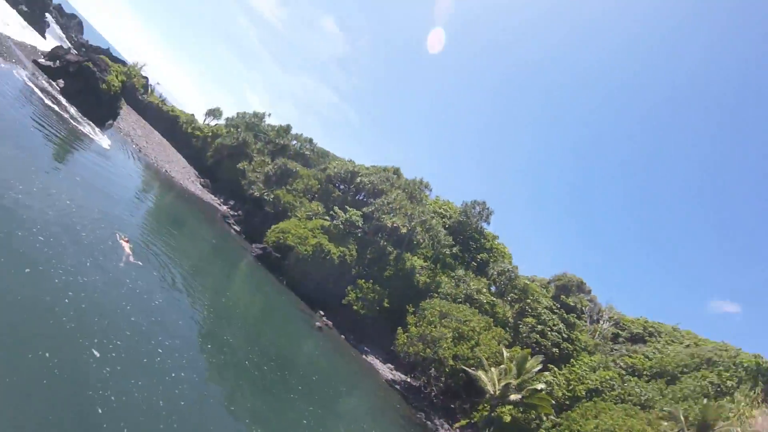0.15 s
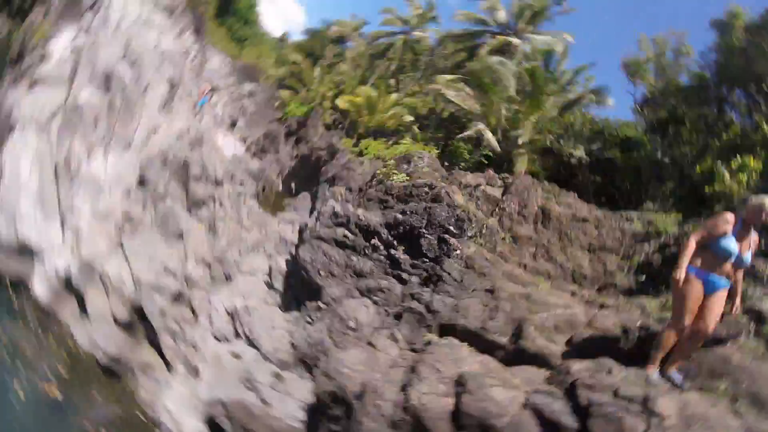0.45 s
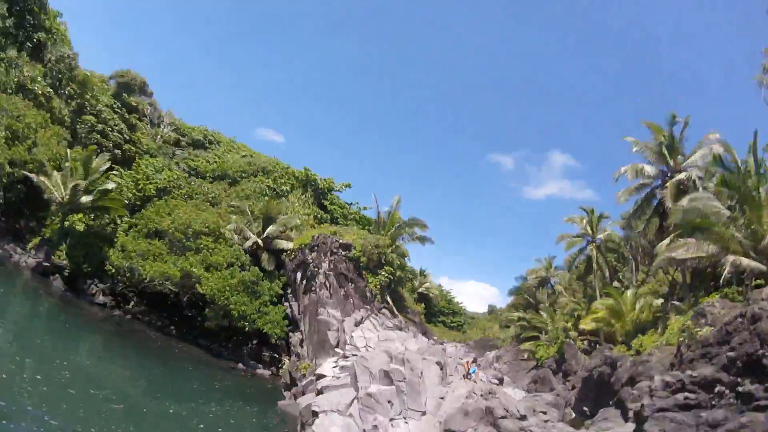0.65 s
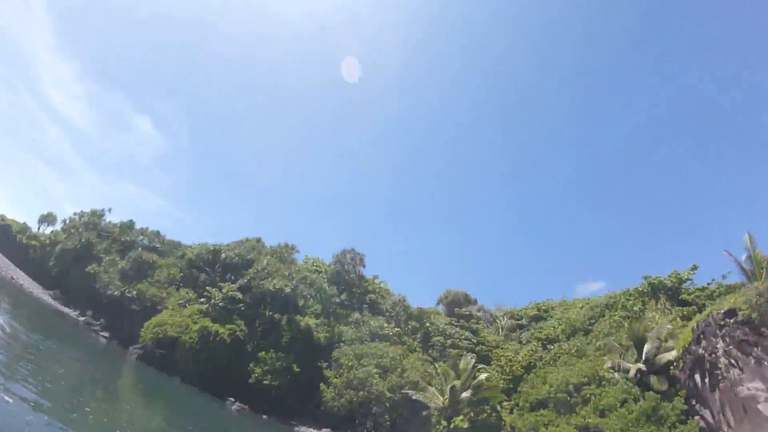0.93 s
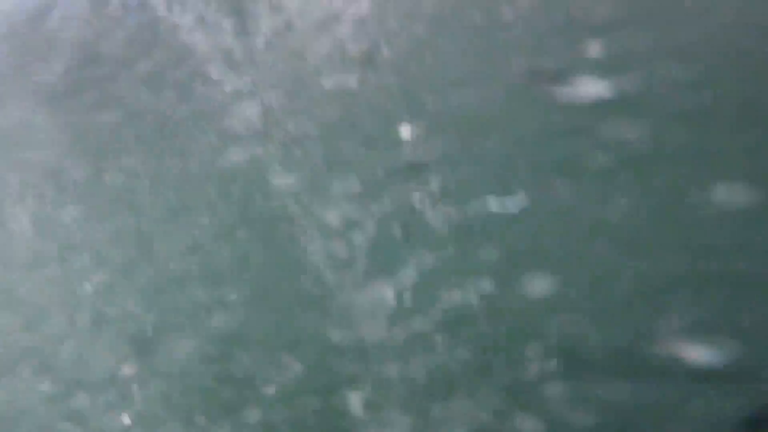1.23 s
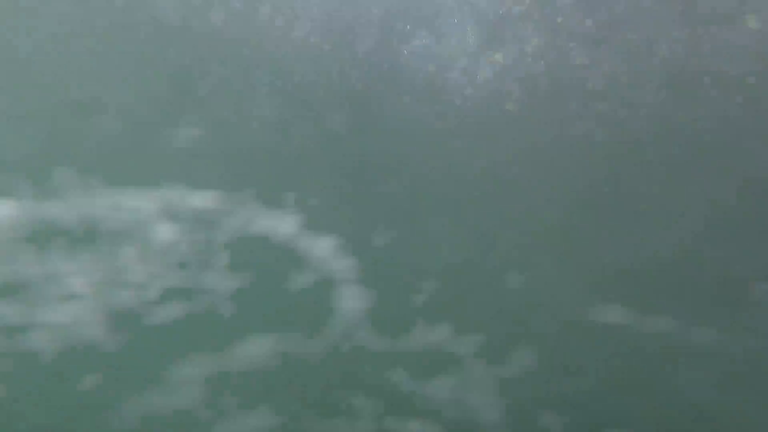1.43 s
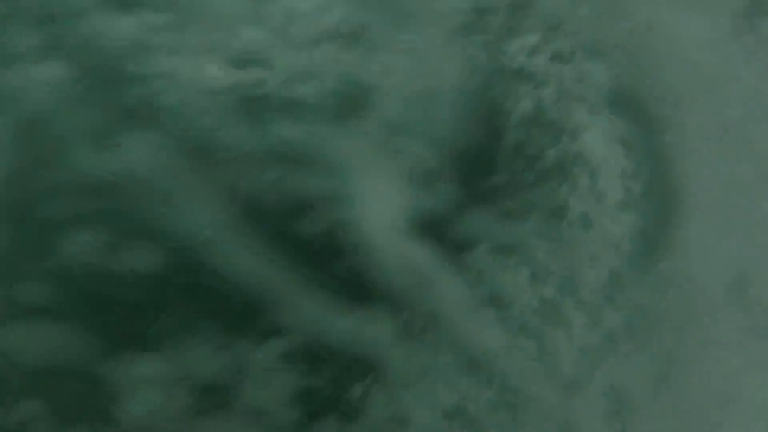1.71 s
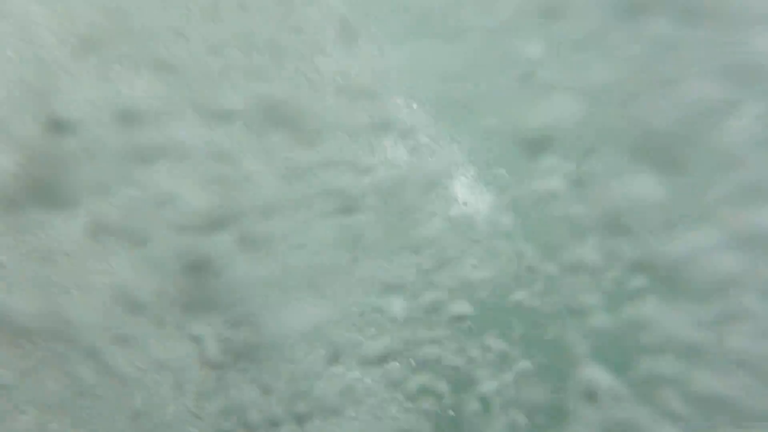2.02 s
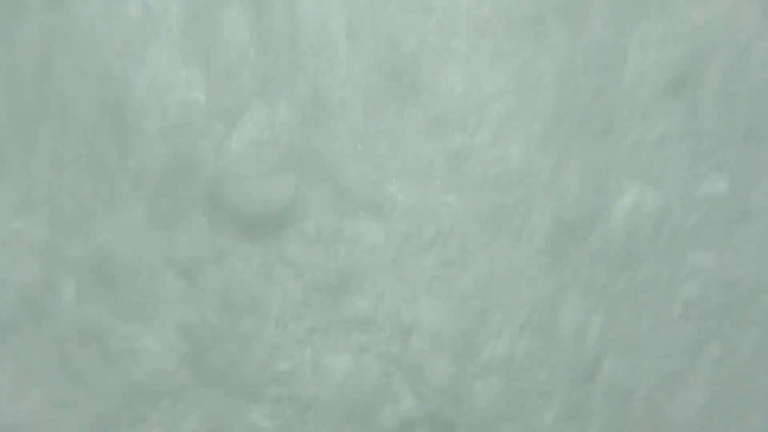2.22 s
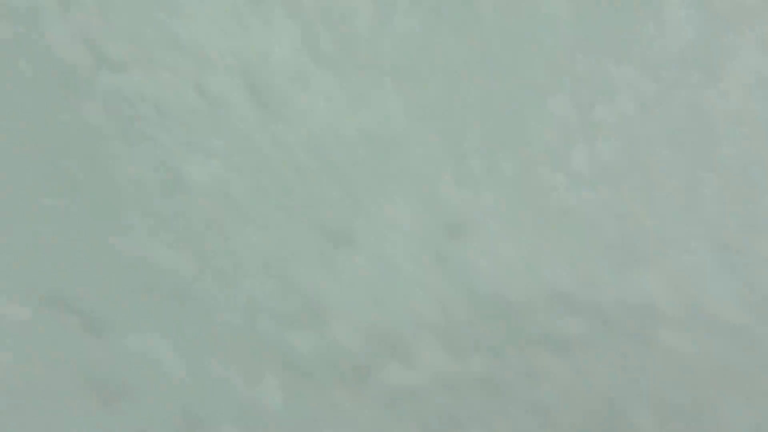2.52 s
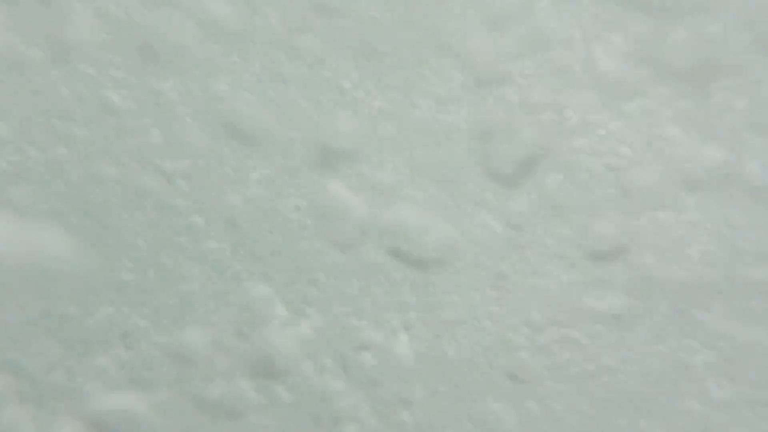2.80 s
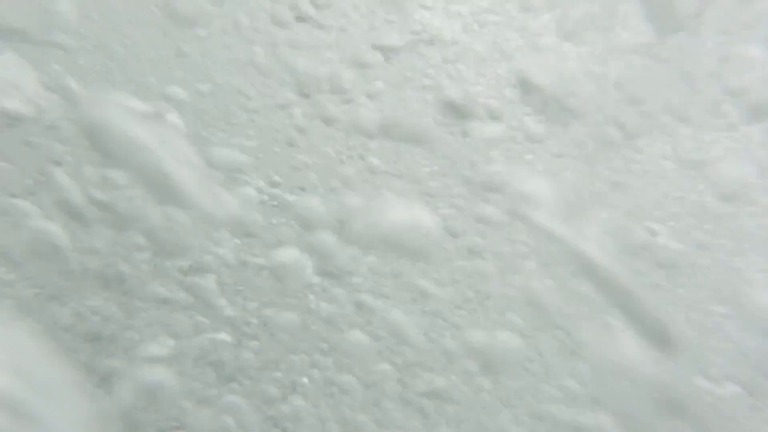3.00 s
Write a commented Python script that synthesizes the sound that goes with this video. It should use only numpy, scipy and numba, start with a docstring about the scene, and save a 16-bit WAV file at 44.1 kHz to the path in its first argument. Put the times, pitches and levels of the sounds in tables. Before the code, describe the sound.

A plunge into water: wind rumble, hard overloaded smack, then dull bubbling under the surface.

```python
"""A small sealed camera falls with a jumper into a rock pool.
First wind noise buffets the microphone, a hand rubs the shell and damped sines creak and squeak.
Then noise bursts of spray hit, and pressure steps snap the membrane.
Water slams the port shut: a wavering tone on a slow heave, driven into overload.
Under water: muffled noise rumble, swarms of damped sines that gurgle and fizz, some bursting on the shell."""
import sys
import numpy as np
from scipy import signal
from scipy.fft import rfft, irfft
from scipy.io import wavfile
from scipy.ndimage import uniform_filter1d
from numba import njit

SR = 44100
rng = np.random.default_rng(int(sys.argv[2]) if len(sys.argv) > 2 else 0)


def output_pcm(signal):
    """Save a mono or channel-first signal as 16-bit PCM at the path in sys.argv[1].

    Samples are clipped to [-1, 1] before scaling.
    """
    pcm = np.clip(np.atleast_2d(signal).T, -1, 1) * 32767
    wavfile.write(sys.argv[1], SR, np.round(pcm).astype(np.int16))


N = 138915

# Levels are those ahead of the gains, filters and random walks in the functions.
# Water. Each row: start in seconds, rumble in dB, gurgle of large bubbles in dB,
# fizz of small bubbles in dB, typical fizz pitch in Hz.
WATER_LEVELS = [(1.2, -36, -51, -62, 1820), (1.242, -27.5, -59, -71, 1840), (1.308, -51, -47.5, -48, 2200),
                (1.352, -30, -55, -59, 1555), (1.422, -30, -31.5, -39.5, 1426), (1.46, -24, -57, -62, 1690),
                (1.5, -19.5, -46, -39, 1556), (1.54, -20, -45, -42, 1504), (1.562, -20.5, -34, -32.5, 1600),
                (1.72, -29, -38, -40, 1714), (1.808, -35, -39.5, -40.5, 1890),
                (1.96, -35, -39.5, -45, 1415), (2.116, -30.5, -46.5, -53, 2380),
                (2.16, -20, -36.5, -39, 2080), (2.34, -34, -36.5, -37.5, 2260),
                (2.4, -20, -31, -37.5, 1970), (2.498, -31, -26.5, -39.5, 2390),
                (2.556, -19.5, -35, -45, 2210), (2.59, -27.5, -30.5, -41.5, 1490),
                (2.666, -24, -27.5, -48, 1736), (2.758, -32, -31, -54, 2050),
                (2.786, -21.5, -29, -45, 1700), (2.862, -44, -38.5, -58, 1660),
                (2.9, -28.5, -38.5, -35, 1560), (2.926, -39, -40.5, -57.5, 1720),
                (3.15, -32, -37, -51, 1610)]
# Typical gurgle pitch. Each row: time in seconds, pitch in Hz.
GURGLE_PITCH = [(1.4, 520), (2.3, 477.5), (2.42, 640), (2.6, 417), (2.72, 518), (2.82, 595), (3.15, 561)]
# Water seals the port and mutes the flow. Each row: from in seconds, to in seconds, muting in dB.
SEALED_SPANS = [(1.45, 1.491, -24)]
# Membrane snaps to a new pressure. Each row: time in seconds, signed step (linear), rise in ms.
SNAP_STEPS = [(0.437, 0.016, 0.46), (0.6594, 0.069, 0.06), (.717, 0.023, 0.098), (0.789, 0.036, 0.18),
              (0.8312, 0.32, 0.71), (0.8848, 0.057, 0.083), (.912, 0.057, .2), (.921, -0.077, .2),
              (.9405, -0.24, 0.56), (0.947, -0.1, 0.22), (.969, 0.033, .15), (0.983, 0.14, .2),
              (1.008, -.1, 0.097), (1.017, 0.2, 0.19), (1.0871, 0.15, 0.044), (1.129, -0.052, 0.58),
              (1.1313, 0.27, 0.4), (1.1405, 0.36, 0.035), (1.2032, 0.067, 0.67), (1.228, 0.49, 0.31),
              (1.2307, -0.54, 0.19), (1.2488, -0.14, 0.54), (1.2502, 0.42, 0.39), (1.4561, -0.4, 0.49),
              (1.458, 0.89, 0.024), (1.4686, 0.071, 0.35), (1.469, -0.55, 0.057), (1.4783, -0.24, 0.35),
              (1.4798, 0.71, 0.016), (1.49, 0.31, 0.35), (1.4926, -0.53, 0.035), (1.7166, 0.26, 0.1),
              (2.1306, 0.12, 0.08), (2.325, 0.21, 0.089), (2.4036, -0.44, 0.48), (2.4537, 0.28, 0.096),
              (2.6794, 0.29, 0.14), (2.891, 0.15, 0.43), (2.8937, -0.17, 0.089), (3.0985, 0.092, 0.13)]
# Single bubbles and short creaks. Each row: start in seconds, pitch in Hz, peak in dB,
# cycles at the starting pitch in half the ring.
RING_EVENTS = [(.201, 940, -26, 13), (0.2423, 1150, -17.5, 10), (0.296, 2700, -30, 9.9),
               (.306, 1004, -18.5, 10.7), (.355, 65.7, -9.5, 6.9), (1.2288, 8300, -11.5, 20),
               (1.229, 1750, -2, 5.1), (1.2303, 3190, 1.5, 6.2), (1.248, 7100, -23, 16),
               (1.345, 2390, -4.5, 1.7), (1.348, 2030, -18, 2.6), (1.394, 1240, -6.5, 3.1),
               (1.4, 1070, -7.5, 5.8), (1.441, 536, -9.5, 2.2), (1.499, 53.4, -17, 12),
               (1.6946, 1130, -5, 1.5), (2.169, 2330, -14, 5.2), (2.198, 2500, -22, 5),
               (2.223, 2620, -16.5, 7.9), (2.242, 800, -19, 13), (2.2892, 2320, -16.5, 18),
               (2.3246, 2540, -4.5, 5.2), (2.363, 4620, -32.5, 20), (2.36, 2300, -18, 8.7),
               (2.38, 2170, -19, 7.1), (2.393, 610, -14.5, 5.4), (2.399, 860, -5.5, 3.8),
               (2.405, 770, -14, 8.9), (2.416, 570, -6, 4), (2.443, 727, -9, 8.9), (2.4535, 2250, -2, 2.1),
               (2.489, 2200, -22, 6), (2.496, 2480, -22.5, 7.9), (2.518, 2300, -14, 13),
               (2.5223, 2354, -4.5, 11), (2.583, 1450, -17, 6), (2.612, 1094, -12.5, 4.8),
               (2.753, 2540, -32, 22), (2.777, 900, -23, 5), (2.786, 2530, -29.5, 14),
               (2.817, 2440, -23.5, 9.6), (2.866, 800, -23, 6.6), (2.8931, 1300, 14, 0.78),
               (2.895, 1100, -13.5, 3.5), (2.904, 1750, -23.5, 11), (3.022, 2300, -26, 9.8),
               (3.098, 1626, -19.5, 11), (3.135, 960, -16.5, 12)]
# Drops that squeak upward on the shell. Each row: as for the rings, then rise as a share of the pitch.
SQUEAK_EVENTS = [(.249, 1690, -28.5, 37, 1.75), (.269, 291, -19, 14, 0.73), (.31, 950, -26.5, 13, 1.7)]
# Wind on the port. Each row: time in seconds, rumble in dB, flutter above 200 Hz in dB.
WIND_LEVELS = [(0.0, -36.5, -40), (0.086, -33, -43.5), (0.11, -38, -48), (0.154, -32, -36.5),
               (0.286, -28, -42.5), (0.37, -13, -37), (0.444, -36.5, -65), (0.468, -11.5, -62),
               (0.552, -21, -44), (0.66, -15, -35.5), (0.684, -22, -34.5), (0.72, -13, -41),
               (0.794, -20.5, -38.5), (0.866, -12.5, -37), (0.896, -18, -37.5), (1.02, -12, -25),
               (1.068, -30, -50), (1.132, -5, -30), (1.186, -56, -48), (1.21, -29, -68)]
# Gusts that shake the port. Each row: start in seconds, nominal length in seconds, level in dB,
# tilt in dB per octave.
GUST_BURSTS = [(.33, 0.054, -36.5, 3.5), (.472, 0.039, -18, -0.5), (.535, 0.013, -29.5, -4),
               (.575, 0.042, -24.5, -3.5), (.61, .04, -22, -2.5), (.655, 0.0095, -43, 9.5),
               (.7, 0.026, -20.5, -3), (.75, 0.041, -23, -6), (.829, 0.0097, -26.5, 1.5),
               (.853, 0.02, -20.5, -1), (.872, 0.028, -25, -1), (.905, 0.03, -29.5, -0.5),
               (.937, 0.019, -16, -5), (.963, 0.028, -28, 4.5), (.992, 0.027, -26, 3.5),
               (1.045, 0.015, -29, 0), (1.122, 0.018, -15.5, 0.5), (1.2025, 0.011, -23.5, -4)]
# Bursts of spray. Each row: start in seconds, nominal length in seconds, level in dB, tilt in dB per octave.
SPRAY_BURSTS = [ (.8185, 0.012, -30.5, -7), (.873, 0.006, -42, -2.5), (.94, 0.004, -45, 5.5),
                (1.003, 0.025, -42.5, -1), (1.0868, 0.011, -28.5, 3.5), (1.092, 0.057, -40.5, 6),
                (1.2281, 0.0051, -15.5, 0.5), (1.233, 0.036, -39, 5.5), (1.246, 0.01, -34, 1.5),
                (1.252, 0.023, -39.5, 4), (1.272, .055, -52.5, 4), (1.14, 0.033, -40.5, -4),
                (1.314, 0.0052, -35, 0.5), (1.394, 0.0072, -32, -10), (1.345, 0.046, -23.5, -4),
                (1.4, 0.049, -39, -8), (2.521, 0.0077, -24, -4.5)]
# A hand rubs the shell. Each row: start in seconds, nominal length in seconds, level in dB,
# tilt in dB per octave.
RUSTLE_BURSTS = [(.241, 0.034, -36.5, 2.5), (.293, 0.035, -35, -1), (.37, 0.023, -41.5, -1),
                 (.558, 0.018, -45, 0.5)]
# Faint airy hiss. Each row: time in seconds, level in dB.
HISS_LEVELS = [(0.0, -52), (0.19, -55), (0.38, -61.5), (0.7, -64.5), (1.0, -71.5), (1.18, -60.5),
               (1.42, -59), (2.08, -70), (2.15, -67), (2.48, -64.5), (2.56, -79), (2.83, -84), (3.15, -86)]
# Noise spectra, water to hiss. Each row: frequency in Hz, relative level in dB per Hz.
WATER_SPECTRUM = [(12, -34), (20, -7), (64, -1.5), (200, -14), (260, -22.5), (440, -120)]
WIND_SPECTRUM = [(12, -30), (20, -1.5), (32, 1.5), (112, -3), (183, -11.5), (200, -12), (260, -41),
                 (440, -120)]
FLUTTER_SPECTRUM = [(120, -33), (200, 1), (500, -11.5), (1000, -19.5), (2000, -43), (4000, -55.5),
                    (9000, -74.5)]
SPRAY_SPECTRUM = [(240, -35.5), (400, -3), (1480, -4), (1640, -13), (1800, -8), (2310, -5.5), (3500, -13.5),
                  (5000, -30.5), (6560, -28), (11000, -45), (14000, -67.5)]
RUSTLE_SPECTRUM = [(410, -38.5), (700, -8), (1080, -6), (1450, -16), (1830, -10), (3230, -20.5),
                   (4690, -19), (9000, -54.5), (11700, -81), (19800, -120)]
HISS_SPECTRUM = [(410, -25.5), (700, 3.5), (1450, -0.5), (1750, 0), (1880, -2), (2140, -1.5), (2780, -5.5),
                 (5900, -14), (14000, -26)]

POPS_FROM_S = 2.12  # small, sharp bubble pops join the fizz from here
SLAM_S, SLAM_HOLD_S, SLAM_FADE_MS = 1.349, 0.015, 6.2
SLAM_HZ, SLAM_WANDER = 942.5, 0.33  # wander in natural-log pitch
HEAVE_HZ, HEAVE_DB = 103.3, -1
SLAM_DRIVE_DB, SLAM_DB, LEAK_DB = 13, -7, -26
SNAP_DECAY_MS, CRACKLE_DB, CRACKLE_MS = 3.5, -6.5, 0.52
PORT_HZ, PORT_T60_S, PORT_DB = 6620, .009, -16.5
PORT_WIDTH_HZ, PORT_LIFT_DB = 470, 5
HOUSING_HZ = 3285
MIC_LOW_HZ, MIC_TOP_HZ, TOP_HZ = 18, 11400, 15800


def water():
    """Churned water rumbles as low noise; bubbles ring as damped sines, muted while the port is sealed."""
    t, levels = np.arange(N) / SR, np.array(WATER_LEVELS)
    gurgle_hz = np.interp(t, *np.array(GURGLE_PITCH).T)
    fizz_hz = np.interp(t, levels[:, 0], levels[:, 4])
    gurgle = swarm(count=4500, centre_hz=gurgle_hz, octaves=1.514, cycles=6.3, scatter_db=3.5)
    fizz = swarm(count=6000, centre_hz=fizz_hz, octaves=1.324, cycles=6.4, scatter_db=3.5)
    ticks = port_colour(swarm(count=2500, centre_hz=5400, octaves=.8, cycles=6, scatter_db=2.5))
    pops = swarm(count=450, centre_hz=2340, octaves=0.6, cycles=4.5, scatter_db=3.5)

    rumble = coloured(WATER_SPECTRUM) * undb(0.47 * walk(24.93))
    gurgle = housing(gurgle) * undb(3.5 + 2.0 * walk(30.015))
    fizz = fizz * undb(2.0 + 2.2 * walk(70))
    pops = pops * (t > POPS_FROM_S) * undb(-1.5)
    ticks = ticks * undb(-31.0 + 4.1 * walk(30.32))
    small_bubbles = housing(fizz + pops) + ticks

    seal_db = sum(db * .5 * (np.tanh((t - start) / 0.00067) - np.tanh((t - end) / 0.0013))
                  for start, end, db in SEALED_SPANS)
    flow = (curve(WATER_LEVELS, 1) * rumble
            + curve(WATER_LEVELS, 2) * gurgle
            + curve(WATER_LEVELS, 3) * small_bubbles)
    return undb(seal_db) * flow


def slam():
    """A wavering air pocket rides a slow heave and is flattened by overload; froth hisses in the port."""
    t = np.arange(N) / SR - SLAM_S
    size = (t > 0) * np.exp(-1000 * np.maximum(t - SLAM_HOLD_S, 0) / SLAM_FADE_MS)
    pocket_hz = SLAM_HZ * np.exp(SLAM_WANDER * walk(500))
    pocket = np.sin(2 * np.pi * np.cumsum(pocket_hz) / SR) * undb(4.6 * walk(300))
    heave = undb(HEAVE_DB) * np.cos(2 * np.pi * HEAVE_HZ * t + 0.46) * size
    rough = walk(900) + undb(-5.0) * walk(3000)
    flat = np.tanh(undb(SLAM_DRIVE_DB) * size * (pocket + heave + rough))
    thump = undb(SLAM_DB) * port(housing(flat) + undb(LEAK_DB) * flat)
    band = signal.butter(2, [5600, 8600], "band", fs=SR, output="sos")
    froth = port_colour(signal.sosfilt(band, rng.standard_normal(N)))
    return thump + undb(-26.0 + 7.1 * walk(250)) * size * froth


def snaps():
    """Pressure steps, each a tanh edge with its own rise time and a crackle around it."""
    t = np.arange(N) / SR
    push = sum(step * .5 * (1 + np.tanh(2000 * (t - s) / max(rise_ms, .02))) for s, step, rise_ms in SNAP_STEPS)
    edge = sum(abs(step) * np.exp(-(1000 * (t - s) / CRACKLE_MS) ** 2) for s, step, _ in SNAP_STEPS)
    return port(push + undb(CRACKLE_DB) * edge * walk(5000))


def rings():
    """Bubbles, creaks and squeaks as rough damped sines; the highest are the shell itself and stay bright."""
    rising = [row + (0.13,) for row in RING_EVENTS]
    events = np.array(rising + SQUEAK_EVENTS, float)
    rough = 1 + 0.22 * walk(1500)

    def ring(rows):
        """Sum the damped sines of these rows."""
        start = (rows[:, 0] * SR).astype(np.int64)
        hz, cycles, glide = rows[:, 1].copy(), rows[:, 3].copy(), rows[:, 4].copy()
        return rough * grains(start, hz, undb(rows[:, 2]), cycles, glide, N)

    high = events[:, 1] > 1.2 * HOUSING_HZ
    return housing(ring(events[~high])) + ring(events[high])


def spray():
    """Spray on the shell and a hand rubbing it, as patchy noise bursts."""
    drops = port_colour(bursts(SPRAY_BURSTS, SPRAY_SPECTRUM, 0.085, patchy_db=4.0, rate=220))
    return drops + bursts(RUSTLE_BURSTS, RUSTLE_SPECTRUM, 0.072, patchy_db=4.0, rate=380)


def wind():
    """Turbulence at the port: low buffeting noise, a patchy flutter and gusts."""
    buffet = coloured(WIND_SPECTRUM) * undb(2.26 * walk(30.17))
    flutter = coloured(FLUTTER_SPECTRUM) * undb(-0.5 + 3.9 * walk(60))
    gusts = bursts(GUST_BURSTS, FLUTTER_SPECTRUM, 0.16, patchy_db=3.5, rate=400)
    return curve(WIND_LEVELS, 1) * buffet + curve(WIND_LEVELS, 2) * flutter + gusts


def hiss():
    """Faint airy noise, lifted at the port resonance and unsteady in level."""
    air = undb(5) * port_colour(coloured(HISS_SPECTRUM))
    return curve(HISS_LEVELS, 1) * air * undb(2.5 * walk(60) + 1.8 * walk(16))


def port(push):
    """A pressure change leaks away and rings the microphone port."""
    edge = np.diff(push, prepend=0)
    t = np.arange(2048) / SR
    leak = np.exp(-1000 * t / SNAP_DECAY_MS)
    ringing = undb(PORT_DB) * np.sin(2 * np.pi * PORT_HZ * t) * 1000 ** (-t / PORT_T60_S)
    return signal.fftconvolve(edge, leak + ringing)[:N]


def port_colour(x):
    """The port resonance lifts a narrow band."""
    peak = signal.iirpeak(PORT_HZ, PORT_HZ / PORT_WIDTH_HZ, fs=SR)
    return x + undb(PORT_LIFT_DB) * signal.lfilter(*peak, x)


def housing(x):
    """The sealed shell muffles sound, passing little above its cutoff (a steep lowpass)."""
    return signal.sosfilt(signal.cheby2(5, 30, 1.311 * HOUSING_HZ, fs=SR, output="sos"), x)


def swarm(count, centre_hz, octaves, cycles, scatter_db):
    """Bubbles at random moments spread around a pitch, some louder than the rest; unit RMS."""
    r = rng.random((count, 5))
    start = (r[:, 0] * N).astype(np.int64)
    hz = (centre_hz * np.ones(N))[start] * 2 ** (octaves * (r[:, 1] + r[:, 4] - 1))
    peak = undb(-scatter_db * np.log(1.003 - r[:, 2]))
    return unit(grains(start, hz, peak, cycles * (.5 + r[:, 3]), np.full(count, 0.15), N))


@njit
def grains(start, hz, peak, cycles, glide, size):
    """Damped sines with a soft onset that rise in pitch as they fade."""
    out = np.zeros(size)
    for k in range(len(start)):
        n = int(2 * cycles[k] * SR / hz[k])
        phase = 0.
        for i in range(min(n, size - start[k])):
            u = i / n
            phase += 2 * np.pi * hz[k] * (1 + glide[k] * u) / SR
            out[start[k] + i] += peak[k] * min(phase / 3, 1.) * np.exp(-5 * u) * np.sin(phase)
    return out


def bursts(table, spectrum, attack, patchy_db, rate):
    """Patchy noise bursts that swell, hold and fade; attack is a share of the nominal length."""
    out = np.zeros(N)
    for s, length_s, db, tilt_db in table:
        i, n = int(s * SR), int(1.5 * length_s * SR)
        u = np.arange(n) / (length_s * SR)
        shape = np.exp(-1.5 * u ** 3) * np.minimum(u / attack, 1)
        out[i:i + n] += undb(db) * unit(coloured(spectrum, 8192, tilt_db)[:n]) * shape
    return out * undb(patchy_db * walk(rate))


def coloured(spectrum, size=N, tilt_db=0):
    """Unit-RMS noise through (Hz, dB) points, tilted in dB per octave about 2 kHz."""
    points, hz = np.array(spectrum), np.maximum(np.fft.rfftfreq(size, 1 / SR), 1)
    db = np.interp(np.log(hz), np.log(points[:, 0]), points[:, 1], left=-90, right=-90)
    db = db + tilt_db * np.log2(hz / 2000)
    return unit(irfft(rfft(rng.standard_normal(size)) * undb(db), size))


def walk(rate):
    """Random unit-RMS levels held 1 / rate s and slewed twice."""
    k = int(SR / rate)
    held = np.repeat(rng.standard_normal(N // k + 1), k)
    return unit(uniform_filter1d(uniform_filter1d(held, k), k)[:N])


def curve(table, column):
    """Linear gain from a dB column interpolated over time; -120 dB outside the table."""
    a = np.array(table)
    return undb(np.interp(np.arange(N) / SR, a[:, 0], a[:, column], left=-120, right=-120))


def undb(db):
    """dB to linear amplitude."""
    return 10 ** (np.asarray(db) / 20)


def unit(x):
    """Scale to unit RMS."""
    return x / np.sqrt(np.mean(x ** 2))


def scene():
    """Sum of all sources, one channel."""
    return (water() + slam() + snaps() + rings() + spray() + wind() + hiss())[None]


def record(dry):
    """The recorder rounds peaks, drops the deepest bass, dulls the highest treble and cuts the top."""
    rounded = 0.78 * np.tanh(dry / 0.87)
    mic = signal.butter(2, [MIC_LOW_HZ, MIC_TOP_HZ], "band", fs=SR, output="sos")
    top_cut = signal.ellip(8, .2, 70, TOP_HZ, fs=SR, output="sos")
    return signal.sosfilt(top_cut, signal.sosfilt(mic, rounded))


dry = scene()
out = record(dry)
output_pcm(out)
```